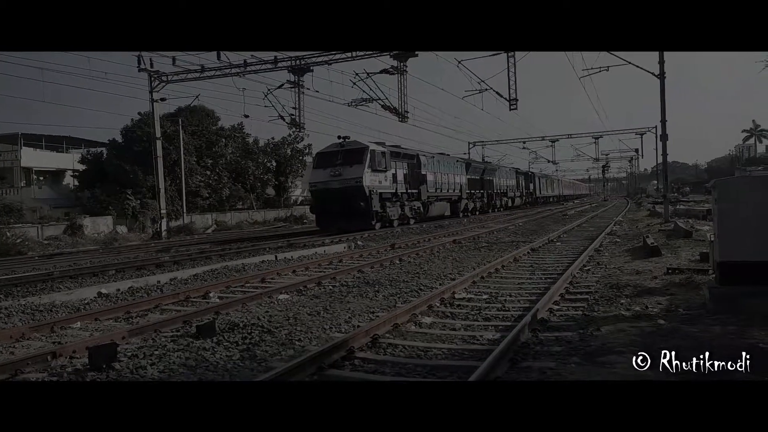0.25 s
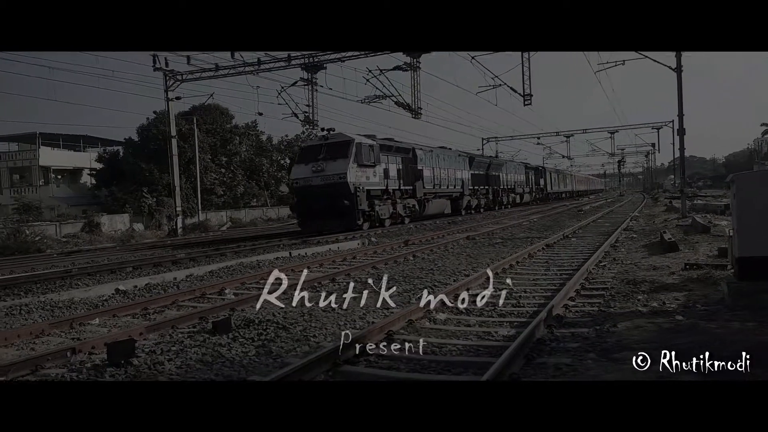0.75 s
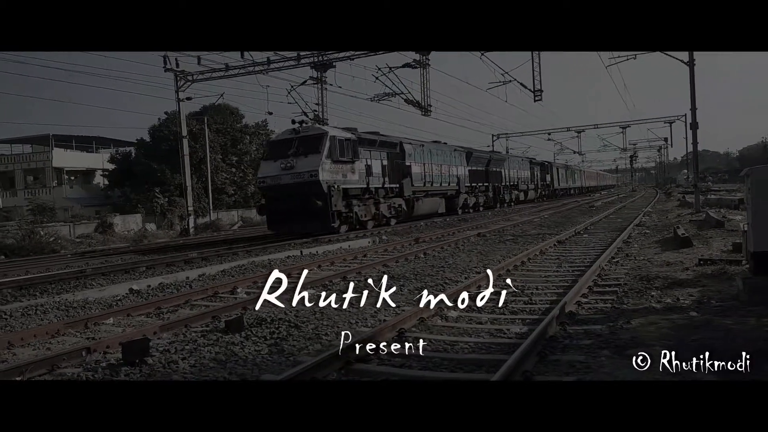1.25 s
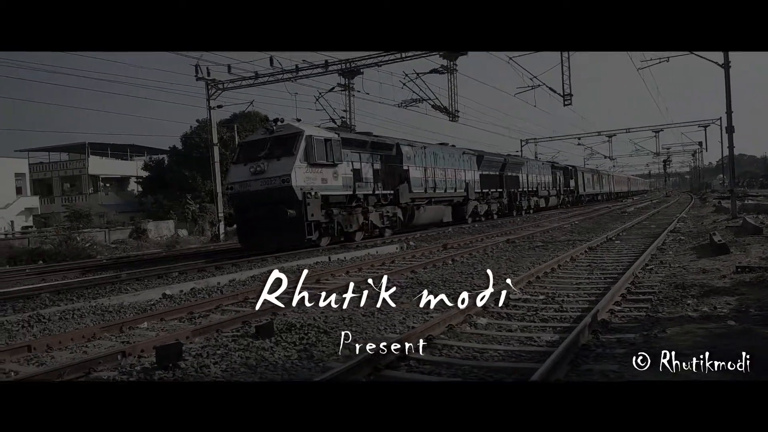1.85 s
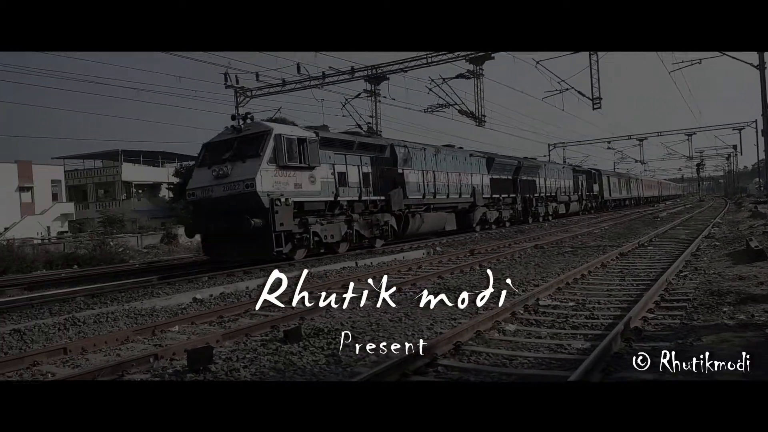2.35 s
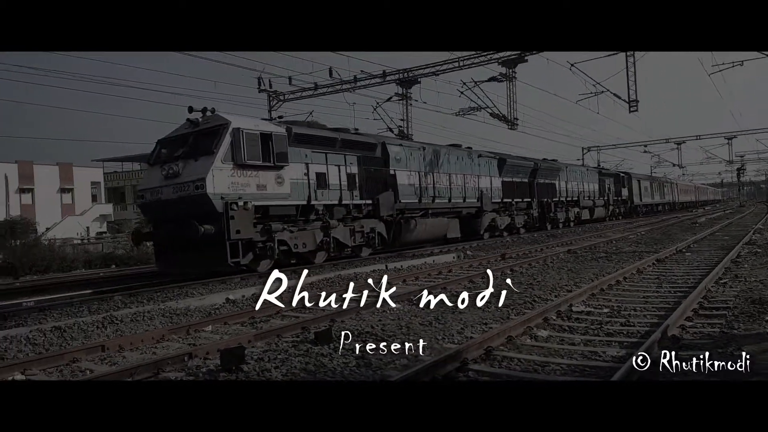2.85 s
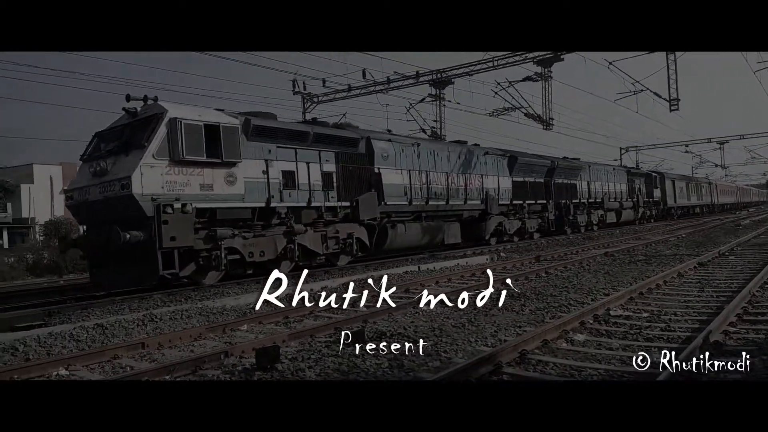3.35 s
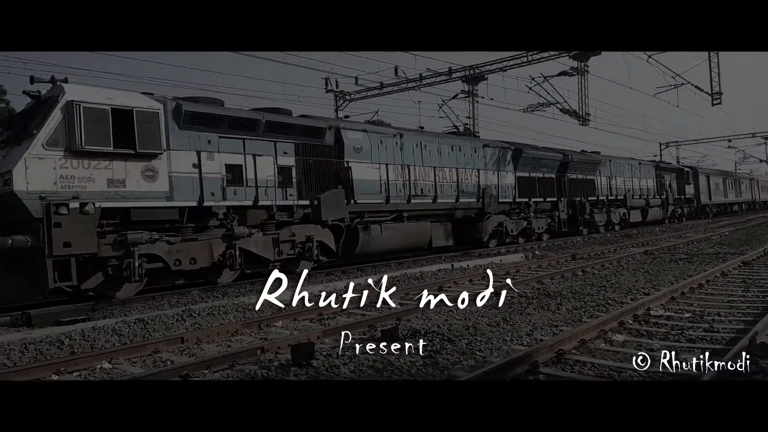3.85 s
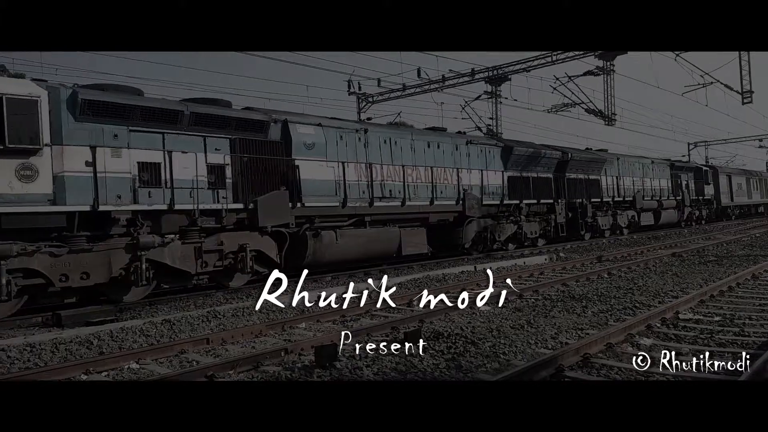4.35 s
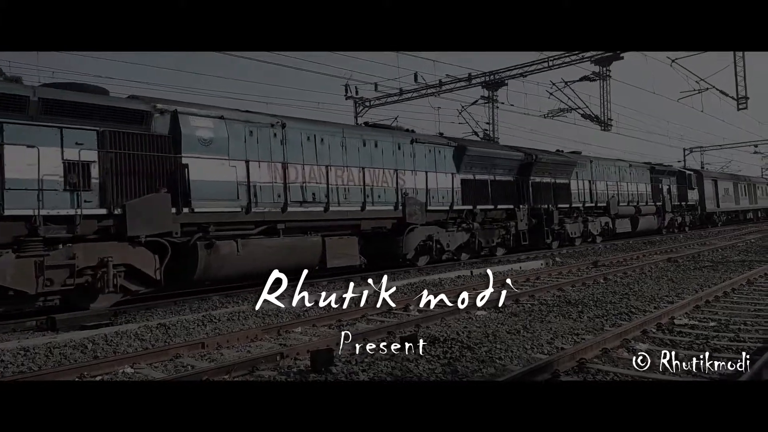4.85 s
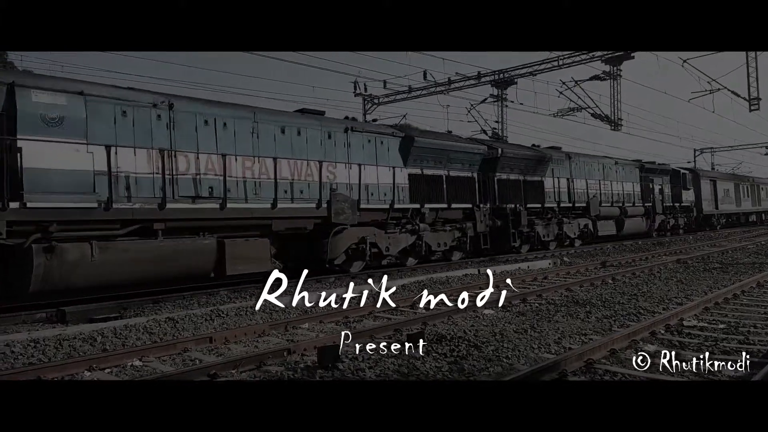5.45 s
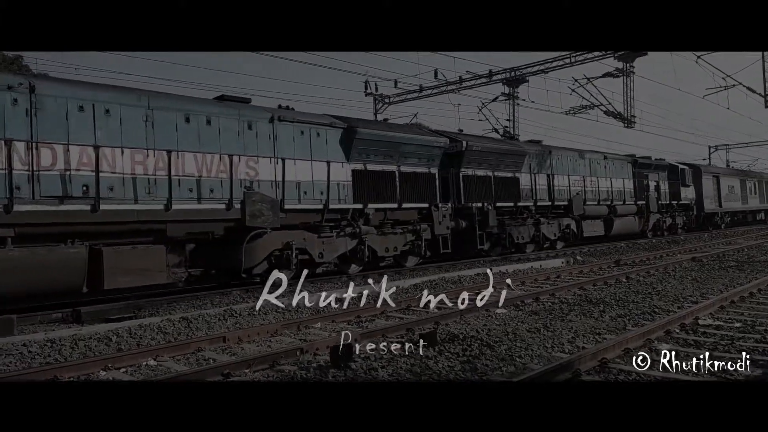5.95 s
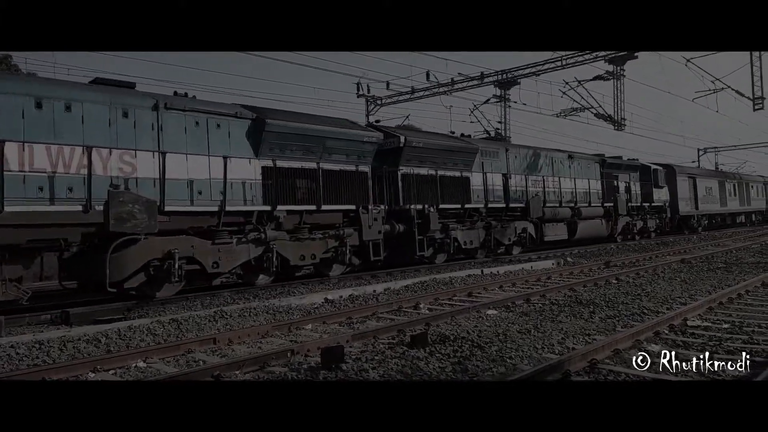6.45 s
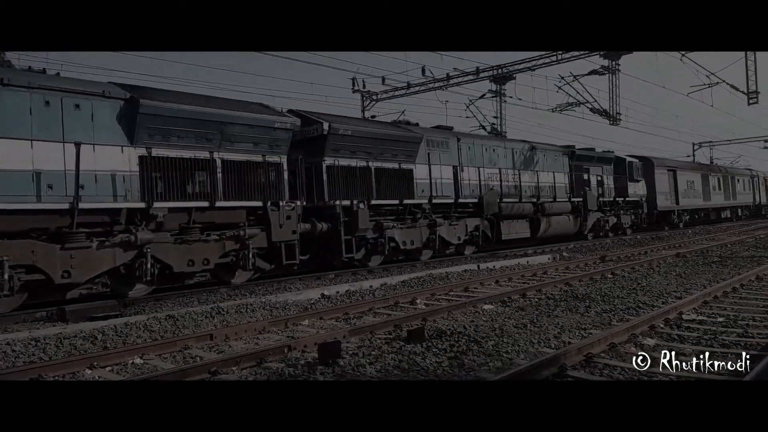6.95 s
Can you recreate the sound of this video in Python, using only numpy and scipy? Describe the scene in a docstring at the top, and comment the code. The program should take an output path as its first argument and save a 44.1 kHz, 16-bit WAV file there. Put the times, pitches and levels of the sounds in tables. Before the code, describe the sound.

From the start, two diesel locomotives approach slowly, heard outdoors from beside the track. Their deep, rasping exhausts throb together over a low rumble, a steady mid-pitched roar and rolling wheels. High turbocharger whistles and machine whines flutter and swell above this. A small single-cylinder engine coughs twice around 0.4 seconds, and a small bird gives one faint, thin chirp at about 1 second. The small engine coughs twice more just before 2 seconds, then catches and putters in quick, uneven thumps. One tiny dry tick comes at about 4.4 seconds. The train keeps growing louder, its whine and hiss strongest around 5 to 6.5 seconds, and its pitch falls slightly as it draws level. The small engine speeds up from about 5 seconds, thumps hardest just after 6 and fades by 7. The deep locomotive throb peaks near 6.5 seconds and continues to the end.

```python
"""A deep, rasping throb: two diesel locomotives draw a train slowly past, their exhausts beating together.
Under it lie a steady mid-pitched engine roar, rolling wheels and the whine of turbochargers, inverters,
blowers and gears. The parts grow louder as they near, and the Doppler effect lowers their tones.
A single-cylinder engine out of sight coughs, catches and picks up speed, each firing a pulse through
its silencer. A small bird chirps once, and there is one dry tick."""
import sys
import numpy as np
from scipy import signal
from scipy.fft import rfft, irfft, next_fast_len
from scipy.io import wavfile
from scipy.ndimage import map_coordinates

SR = 44100
rng = np.random.default_rng(int(sys.argv[2]) if len(sys.argv) > 2 else 0)


def output_pcm(signal):
    """Save a mono or channel-first signal as 16-bit PCM at the path in sys.argv[1].

    Samples are clipped to [-1, 1] before scaling.
    """
    pcm = np.clip(np.atleast_2d(signal).T, -1, 1) * 32767
    wavfile.write(sys.argv[1], SR, np.round(pcm).astype(np.int16))


N = 317545
TIME = np.arange(N) / SR
SLOW_TIME = np.arange(8192) / 1000  # seconds, a coarse grid for slow fluctuations
CRANK_HZ = 6.12


# Low and high exhaust tones. Each row: multiple of the crank speed, relative level in dB.
BOOM_ORDERS = [(7, -11), (8, 0), (9, -5), (10, -16)]
DRONE_ORDERS = [(11, -14), (13, -8), (14, -10), (15, 0), (16, -8), (17, -13)]

def exhausts():
    """Beating: two engines at nearly the same speed are in step once, then slip apart ever more gently."""
    in_step_s, slip_hz, ease_hz_per_s = 1.46, .153, .0128
    lead, since = turns(CRANK_HZ), TIME - in_step_s
    second = lead - slip_hz * since + ease_hz_per_s * since ** 2 / 2
    out = 0
    for crank, boom, drone in ((lead, "boom", "drone"), (second, "second boom", "second drone")):
        out += throb(BOOM_ORDERS, crank, peak_turn=.47, unsteady=.12) * gain_of(passing(boom))
        out += throb(DRONE_ORDERS, crank, peak_turn=.63, unsteady=.18) * gain_of(passing(drone))
    return out


# Close by, the firing tone dominates. Each row: time in seconds, factor on the side tones.
THROB_DEPTH = [(0, .85), (3, .9), (4.9, .92), (5.4, .75), (6.3, .62), (6.7, .3), (7.2, .25)]

def throb(orders, crank_turns, peak_turn, unsteady):
    """Sidebands: unequal cylinders put tones round the loudest one, swelling together once a turn."""
    crank, depth = crank_turns - peak_turn, curve(THROB_DEPTH)
    loudest = max(orders, key=lambda row: row[1])[0]
    sound, power = 0, 0
    for order, db in orders:
        size = gain_of(db) * (1 if order == loudest else depth)
        waver = 1 + unsteady * drift(.53)
        phase = 2 * np.pi * order * crank + upsample(np.unwrap(np.angle(waver)))
        sound += size * upsample(abs(waver)) * np.cos(phase)
        power += size ** 2
    return unit_rms(sound / np.sqrt(power))


# Noise in the exhaust stack. Each row: frequency in Hz, relative density in dB.
RASP_SPECTRUM = [(200, -30), (300, -14), (450, -16), (570, -11), (612, -6), (650, -5), (670, -1),
                 (685, 2.5), (702, -5.5), (730, -2.5), (765, -8), (840, -7), (940, -13), (1100, -24),
                 (1600, -60)]

def rasp():
    """Periodic noise: each crank turn sends nearly the same rasp up the stack, Doppler-shifted in passing."""
    swell_share, peak_turn = .22, .7
    emitted_at = turns(1) * SR
    pair = np.array([resample(x, emitted_at) for x in noise(RASP_SPECTRUM, repeat=.94)])
    pulsing = 1 + swell_share * np.cos(2 * np.pi * (turns(CRANK_HZ) - peak_turn))
    return pair * pulsing * gain_of(passing("rasp"))


# The small engine's speed. Each row: time in seconds, firings per second.
FIRING_RATE = [(2.04, 13.47), (2.3, 13.86), (2.7, 13.95), (3.05, 14.5), (3.5, 13.56), (4.0, 14.8),
               (4.45, 15.15), (4.8, 13.31), (5.05, 13.57), (5.35, 15.3), (5.7, 15.9), (6.1, 17.73),
               (6.5, 19.1), (6.8, 20.2)]
# Its thumps follow the throttle. Each row: time in seconds, typical peak level in dB.
THUMP_LEVEL = [(2.0, -17.5), (2.27, -16), (2.6, -16.5), (2.85, -14.5), (3.25, -15), (3.45, -20), (3.8, -21),
               (4.1, -19), (4.25, -23), (4.45, -18), (4.8, -14), (4.93, -15.5), (5.02, -21), (5.3, -20),
               (5.74, -12.5), (5.87, -17), (6.04, -10.5), (6.16, -9.5), (6.35, -12.5), (6.55, -14.5),
               (6.65, -18), (7.0, -27)]
# Firings that bang harder. Each row: time in seconds, extra level in dB.
BANGS = [(2.698, 3.5), (3.049, 2.5), (3.966, 5.5), (4.5, 3), (4.642, 3.5), (5.36, 4), (5.682, 3),
         (6.479, 3)]
# Coughs before it catches. Each row: start in seconds, level in dB.
COUGHS = [(.305, -21.5), (.438, -20), (1.838, -26), (1.933, -21)]

def single_cylinder():
    """Impulse excitation: each firing sends one pressure pulse through the silencer; no two are alike."""
    catch_s, jitter_s, scatter_db = 2.043, .0003, .8
    fired = np.cumsum(curve(FIRING_RATE) * (TIME > catch_s)) / SR
    due = np.flatnonzero(np.diff(np.ceil(fired)) > 0)
    early, strong = rng.standard_normal((len(due), 2)).T
    level_db = curve(THUMP_LEVEL)[due] + scatter_db * strong
    for s, extra_db in BANGS:
        level_db[np.argmin(abs(TIME[due] - s))] += extra_db
    starts = due - np.round(jitter_s * SR * early).astype(int)
    kicks = np.zeros(N)
    kicks[np.minimum(starts, N - 1)] = -gain_of(level_db)
    for s, db in COUGHS:
        kicks[round(s * SR)] = -gain_of(db)
    return signal.oaconvolve(kicks, silencer())[:N] * pan(side_db=.6)


# The silencer's response. Each row: frequency in Hz, relative gain in dB.
SILENCER_RESPONSE = [(15, -38.5), (45, -14.5), (80, 4.5), (110, -6), (160, -1.5), (198, -20.5), (245, -8),
                     (330, -23), (375, -20), (450, -33.5), (900, -53), (3000, -79), (16000, -125)]

def silencer(size=8192, smear_hz=300):
    """Resonance and dispersion: a minimum-phase ring, held back a little below smear_hz."""
    hz = np.fft.fftfreq(size, 1 / SR)
    log_gain = np.log(gain_of(spectrum_at(SILENCER_RESPONSE, abs(hz))))
    minimum_phase = np.exp(np.conj(signal.hilbert(log_gain)))
    all_pass = np.exp(-2j * np.arctan(hz / smear_hz))
    pulse = np.fft.ifft(minimum_phase * all_pass).real * np.linspace(1, 0, size)
    return pulse / abs(pulse).max()


# The train's broadband noises. Each row: frequency in Hz, relative density in dB.
RUMBLE_SPECTRUM = [(8, -18), (30, -5), (80, 7.5), (115, 2), (200, -4.5), (290, -8.5), (420, -15),
                   (600, -19), (1200, -72)]
ENGINE_ROAR_SPECTRUM = [(250, -49), (450, -12.5), (570, -9.5), (640, -4.5), (685, 1.5), (740, -5.5),
                        (830, -9.5), (930, -11.5), (1050, -23.5), (1600, -80)]
WHEEL_SPECTRUM = [(600, -28.5), (1000, -3.5), (1200, 2.5), (1420, 5), (1600, 0.5), (2050, 0.5),
                  (2500, -5.5), (2950, -7.5), (3300, -11.5), (4000, -16), (5000, -16.5), (7000, -36),
                  (12000, -68)]
HISS_SPECTRUM = [(3000, -5.5), (4400, -10), (5300, 6.5), (5600, 5.5), (5900, 7.5), (6300, 2), (7200, -0.5),
                 (8400, -6), (9100, -12), (10100, -18.5), (11200, -25.5), (13500, -32), (14800, -68.5)]
BOGIE_SPECTRUM = [(200, -32), (300, -3.5), (380, -4), (520, -14.5), (750, -8.5), (1000, -11), (1400, -44)]
INTAKE_SPECTRUM = [(2500, -4.5), (3800, 1), (4700, 4.5), (6500, -3.5), (9000, -37), (11500, -21),
                   (13300, -30), (14500, -57)]
# The rolling wheels. Each row: time in seconds, level in dB.
WHEEL_LEVEL = [(0, -37), (.6, -38), (1.7, -35), (2.9, -34.5), (4.0, -32.5), (4.8, -30.5), (5.6, -30.5),
               (6.3, -32), (7.2, -30.5)]

def roar():
    """Incoherent addition: independent noises, most a little gusty, sum in power to one roar."""
    rumble = noise(RUMBLE_SPECTRUM) * gain_of(passing("rumble") + .85 * wander(6.1))
    engine_roar = noise(ENGINE_ROAR_SPECTRUM) * gain_of(passing("engine roar") + 1.4 * wander(27))
    wheels = noise(WHEEL_SPECTRUM) * gain_of(curve(WHEEL_LEVEL) + .5 * wander(20))
    hiss = noise(HISS_SPECTRUM) * gain_of(passing("hiss") + wander(22))
    bogies = noise(BOGIE_SPECTRUM) * gain_of(passing("bogies"))
    intake = noise(INTAKE_SPECTRUM) * gain_of(passing("intake"))
    return rumble + engine_roar + wheels + hiss + bogies + intake


# Turbocharger tones. Each row: frequency in Hz before any speed change or Doppler shift,
# relative level in dB, flutter width in Hz, steady share from 0 to 1, left minus right in dB.
TURBO_TONES = [(5404, 0, 22, .9, 0), (5385, -10, 75, 0, 0)]
FIZZ_TONES = [(10780, -2.5, 170, 0, -4), (10450, -5.5, 300, 0, -4)]
SECOND_TURBO_TONES = [(5290, -4, 32, .15, 1.5), (5290, -2, 80, 0, 1.5)]
# The leading one crosses from left to right. Each row: time in seconds, left minus right in dB.
TURBO_SIDE = [(0, 4), (2.4, 7), (3.9, 5), (4.5, 2), (5.4, 1.5), (5.8, -3), (6.5, -4), (7.2, 0)]
# The second one races briefly. Each row: time in seconds, factor on its speed.
SECOND_TURBO_SPEED = [(.6, 1), (1.3, 1.018), (1.65, 1.014), (2.0, 1.008), (2.35, 1), (7.2, 1)]

def turbochargers():
    """Frequency modulation: pitch follows shaft speed; the leading whistle wobbles once a crank turn."""
    whistle = whine(TURBO_TONES, "turbo", behind_s=.5, wobble=.0022)
    fizz = whine(FIZZ_TONES, "fizz", behind_s=.5)
    second = whine(SECOND_TURBO_TONES, "second turbo", behind_s=1.3, speed=curve(SECOND_TURBO_SPEED))
    return (whistle + fizz) * pan(curve(TURBO_SIDE)) + second


# Machine tones. Each row: frequency in Hz before the Doppler shift, relative level in dB,
# flutter width in Hz, steady share from 0 to 1, left minus right in dB.
INVERTER_TONES = [(2965, -4, 20, .55, -2.5), (2950, -9, 75, 0, -2), (3025, -14, 20, .2, -1)]
SECOND_INVERTER_TONES = [(2902, 0, 20, .4, -4.5)]
BLOWER_TONES = [(1348, -.5, 12, .95, -12), (1380, -9, 8, .7, -9), (1443, -8, 18, .2, -9),
                (966, -5, 13, .22, -9)]
GEAR_TONES = [(3469, .5, 12, .65, -3)]
HUM_TONES = [(286.2, -0.5, 7.4, 0.11, 5), (1940, -6, 6.9, 0.18, -9)]

def machinery():
    """Line spectra: inverters, blower, gears and a hum each sound at a few narrow frequencies."""
    inverters = whine(INVERTER_TONES, "inverter", behind_s=.7)
    inverters += whine(SECOND_INVERTER_TONES, "second inverter")
    blower = whine(BLOWER_TONES, "blower", behind_s=1.0)
    return inverters + blower + whine(GEAR_TONES, "gears") + whine(HUM_TONES, "hum")


def whine(tones, part, behind_s=0, wobble=0, speed=1):
    """Multipath interference: tones arrive directly and by shifting reflections, so they flutter."""
    out = np.zeros((2, N))
    crank_swing = np.cos(2 * np.pi * turns(CRANK_HZ))
    source_time = turns(speed, behind_s) + wobble * np.cumsum(crank_swing) / SR
    for hz, db, width_hz, steady, side_db in tones:
        carrier = np.exp(2j * np.pi * hz * source_time)
        hunting = np.cumsum(.000704 * hz * drift(4.8).real) * SLOW_TIME[1]  # the speed hunts a little
        shared = drift(width_hz)
        for channel, way in enumerate((1, -1)):
            scattered = (shared + drift(width_hz)) / np.sqrt(2)
            flutter = np.sqrt(steady) + np.sqrt(1 - steady) * scattered
            tone = carrier * upsample(flutter * np.exp(2j * np.pi * hunting))
            out[channel] += gain_of(db + way * side_db / 2) * unit_rms(tone.real)
    return out * gain_of(passing(part))


# Air stirred by the train. Each row: frequency in Hz, relative density in dB.
BUFFET_SPECTRUM = [(5, -12), (15, -2), (28, 0), (40, -2), (80, -22), (300, -60)]

def buffet():
    """Turbulence: the stirred air arrives in deep, lumpy gusts."""
    return noise(BUFFET_SPECTRUM) * gain_of(passing("buffet") + 2 * wander(3))


# The bird's note. Each row: time in seconds, pitch in Hz, level in dB.
CHIRP = [(.86, 7550, -84), (.93, 7540, -65), (1.0, 7800, -55), (1.06, 7750, -72)]

def bird():
    """Frequency modulation: one thin, gliding note trembles slightly in pitch."""
    hz = curve(CHIRP) + 70 * wander(55)
    sounding = (TIME > CHIRP[0][0]) & (TIME < CHIRP[-1][0])
    return sounding * gain_of(curve(CHIRP, column=2)) * np.sin(2 * np.pi * np.cumsum(hz) / SR)


def tick(start_s=4.3603, db=-26):
    """An impulse has a flat spectrum: one tiny, sharp, dry tick."""
    return gain_of(db) * (np.arange(N) == round(start_s * SR))


# Each entry, by part: closest approach in seconds, level there in dB, loss per doubled distance in dB.
APPROACHES = {
    "boom": (6.65, -15.5, 6.73), "second boom": (9.5, -30, 2.1), "rasp": (6.2, -31, 2.3),
    "drone": (5.8, -26, 2.3), "second drone": (9.5, -29.5, 4.8), "rumble": (5.6, -24.5, 4.7),
    "engine roar": (5.8, -31.2, 4.6), "hiss": (6.2, -41.5, 6.6), "bogies": (6.8, -33, 11),
    "intake": (4.65, -55.5, 17), "turbo": (5.5, -39.5, 6.1), "second turbo": (6.5, -44.5, 4.6),
    "fizz": (6.2, -60.5, 11), "inverter": (5.7, -38.5, 7.6), "second inverter": (6.4, -46, 3.8),
    "blower": (4.4, -44, 2.6), "gears": (4.5, -52.5, 3.3), "hum": (5.5, -38.5, 10.3),
    "buffet": (6.3, -35.5, 1.2)}
# Brief swells and dips. Each row: centre in seconds, half length in seconds, gain in dB, part.
SWELLS = [(0.695, 0.33, -7, "turbo"), (1.296, 0.12, 5.5, "turbo"), (2.1, 0.16, -2.5, "turbo"),
          (2.442, 0.1, 4.5, "turbo"), (2.795, 0.36, 4.5, "turbo"), (3.203, 0.11, 5.5, "turbo"),
          (3.473, 0.31, -8.5, "turbo"), (3.94, 0.032, 8, "turbo"), (4.196, 0.26, -2.5, "turbo"),
          (4.464, 0.012, 10, "turbo"), (4.605, 0.16, 3, "turbo"), (5.402, 0.14, 4.5, "turbo"),
          (5.947, 0.23, -6, "turbo"), (7, 0.31, -4, "turbo"), (6.44, 0.021, 5, "turbo"),
          (1.75, 0.4, 8, "second turbo"), (4.798, 0.14, 6.5, "second turbo"),
          (6.16, 0.11, 4, "second turbo"), (1.7, 0.69, 5.5, "inverter"), (4.95, 0.44, 4.5, "inverter"),
          (5.24, 0.034, 7.5, "inverter"), (6.508, 0.044, 10, "inverter"), (1.7, 0.7, 5, "second inverter"),
          (4.9, .3, 5, "second inverter"), (7.1, 0.14, 6, "second inverter"), (2.2, 0.29, 6.5, "gears"),
          (3.75, 0.39, 4.5, "gears"), (5.2, 0.33, 13.5, "gears"), (5.626, 0.067, 14.5, "gears"),
          (6.9, .6, -5, "gears"), (.3, .29, 3, "rumble"), (.6, 0.53, -3, "blower"), (1.7, 0.9, 6, "blower"),
          (6.2, 0.58, 3.5, "blower"), (4.622, 0.45, 11.5, "intake"), (5.648, 0.1, 3, "drone"),
          (6.1, .7, 2, "rasp"), (3.2, .7, -1.5, "rasp"), (6.195, 0.28, 2.5, "bogies")]

def passing(part, nearest_m=10.3, speed_m_per_s=7.97):
    """Spreading loss: a part's level in dB falls with distance, with any swells on top."""
    nearest_s, near_db, doubling_db = APPROACHES[part]
    distance_m = np.hypot(nearest_m, speed_m_per_s * (TIME - nearest_s))
    swells = sum(db * np.exp(-((TIME - s) / half_s) ** 2)
                 for s, half_s, db, name in SWELLS if name == part)
    return near_db - doubling_db * np.log2(distance_m / nearest_m) + swells


# The fall in pitch as the train draws level. Each row: time in seconds, factor on frequency.
DOPPLER = [(0, 1), (3, .999), (4.5, .995), (5.5, .990), (6.5, .984), (7.2, .981)]

def turns(hz, behind_s=0):
    """Doppler effect: cycles heard so far from a moving part; one further back drops in pitch later."""
    return np.cumsum(hz * np.interp(TIME - behind_s, *np.transpose(DOPPLER))) / SR


# Each row: time in seconds, lag of the left channel behind the right in milliseconds.
LEFT_LAG = [(0, -0.071), (3, -0.053), (4.5, 0.051), (5.5, 0.18), (6.5, 0.33), (7.2, 0.39)]

def bearing(pair):
    """Path difference: the delay between left and right follows the train's bearing."""
    half_lag_s = curve(LEFT_LAG) / 2000
    return np.array([resample(x, (TIME + way * half_lag_s) * SR) for x, way in zip(pair, (-1, 1))])


# Each row: frequency in Hz, correlation of left and right (negative counts as zero).
COHERENCE = [(30, 0), (120, 0.94), (300, 0.7), (700, 0.93), (1200, 0.5), (3000, 0.31), (8000, 0.1),
             (12000, -0.5)]
# Each row: frequency in Hz, left minus right in dB.
BALANCE = [(60, 0.5), (89, -0.5), (130, 3.5), (200, -1), (290, 0.5), (430, -0.5), (640, -1.5), (950, 0.5),
           (1410, -5), (2100, -8), (3120, -3.5), (4630, -0.5), (6870, -6.5), (10200, -5.5)]

def noise(spectrum, repeat=0):
    """Partial coherence: stereo noise, less alike in the treble; a share may repeat each crank turn."""
    size = next_fast_len(N)
    hz = np.fft.rfftfreq(size, 1 / SR)
    left, independent = rfft(rng.standard_normal((2, size)))
    same = np.clip(spectrum_at(COHERENCE, hz), 0, 1)
    right = same * left + np.sqrt(1 - same ** 2) * independent
    pair = np.array([left, right]) * pan(spectrum_at(BALANCE, hz))
    roll_off = np.maximum(hz / spectrum[-1][0], 1) ** 2
    colour = gain_of(spectrum_at(spectrum, hz)) / roll_off
    comb = 1 / abs(1 - repeat * np.exp(-2j * np.pi * hz / CRANK_HZ))
    return unit_rms(irfft(pair * colour * comb, size)[:, :N])


def drift(rate_hz):
    """Low-pass noise: a complex curve of rms 1 on the coarse grid, changing up to about rate_hz."""
    hz = np.fft.fftfreq(len(SLOW_TIME), SLOW_TIME[1])
    real, imaginary = rng.standard_normal((2, len(hz)))
    slow = np.fft.ifft((real + 1j * imaginary) / (1 + (hz / rate_hz) ** 4))
    return slow / np.std(slow)


def wander(rate_hz):
    return upsample(unit_rms(drift(rate_hz).real))


def upsample(slow):
    return np.interp(TIME, SLOW_TIME, slow)


def resample(x, positions):
    return map_coordinates(x, [positions], order=3, mode="mirror")


def curve(rows, column=1):
    """Linear interpolation of one column in time."""
    rows = np.asarray(rows)
    return np.interp(TIME, rows[:, 0], rows[:, column])


def spectrum_at(rows, hz):
    """Interpolation on a log-frequency axis."""
    row_hz, value = np.transpose(rows)
    return np.interp(np.log(hz + 1), np.log(row_hz + 1), value)


def pan(side_db):
    """Level difference: a pair of gains, the left side_db above the right."""
    return gain_of(side_db * np.array([[.5], [-.5]]))


def gain_of(db):
    return 10 ** (np.asarray(db) / 20)


def unit_rms(x):
    return x / np.sqrt(np.mean(x ** 2) + 1e-20)


def scene():
    """Superposition: all the sources add, in stereo, beside the line."""
    train = exhausts() + rasp() + roar() + turbochargers() + machinery()
    return bearing(train + single_cylinder()) + buffet() + bird() + tick()


def record(dry):
    """Band limiting: short fades at both ends, then a steep low-pass filter."""
    fade_s, cutoff_hz = .004, 16300
    fades = np.minimum(np.minimum(TIME, TIME[::-1]) / fade_s, 1)
    low_pass = signal.firwin(511, cutoff_hz, window=("kaiser", 9), fs=SR)
    return signal.oaconvolve(dry * fades, low_pass[None], "same")


dry = scene()
out = record(dry)
output_pcm(out)
```